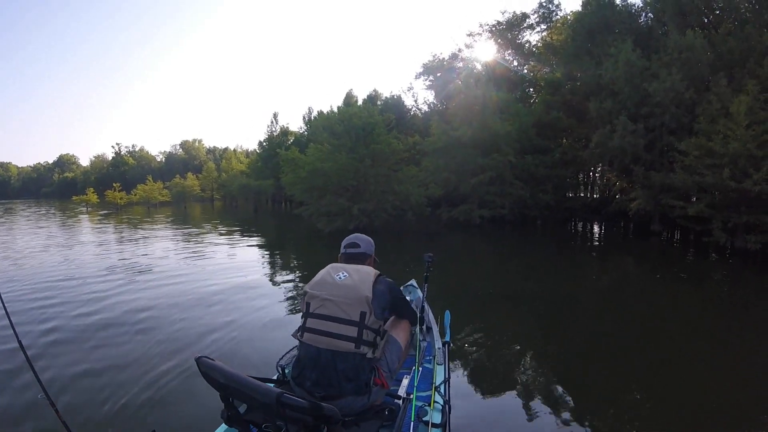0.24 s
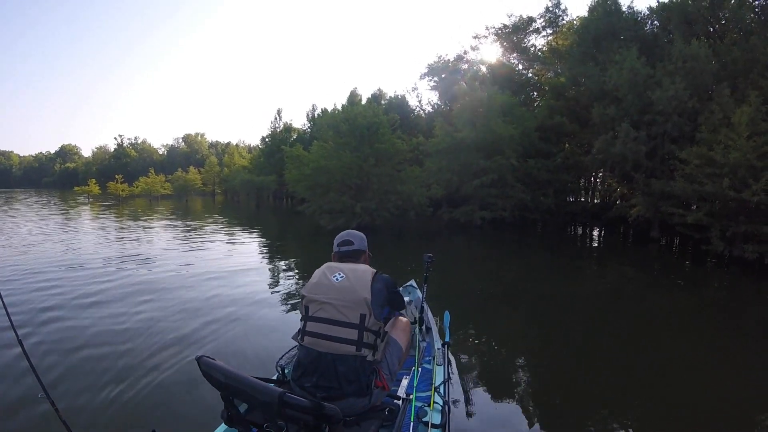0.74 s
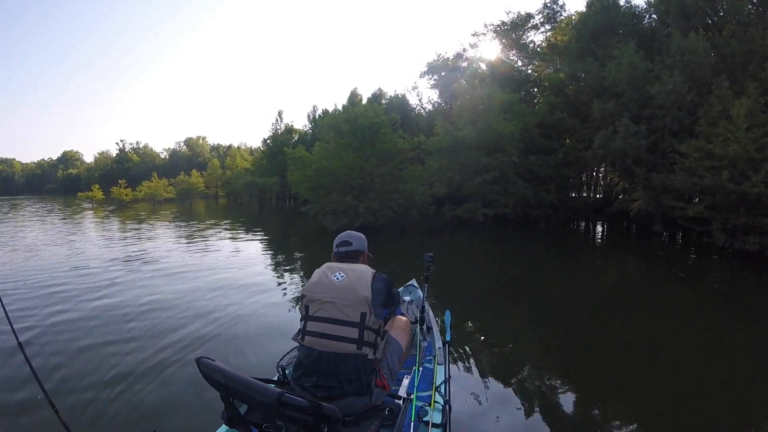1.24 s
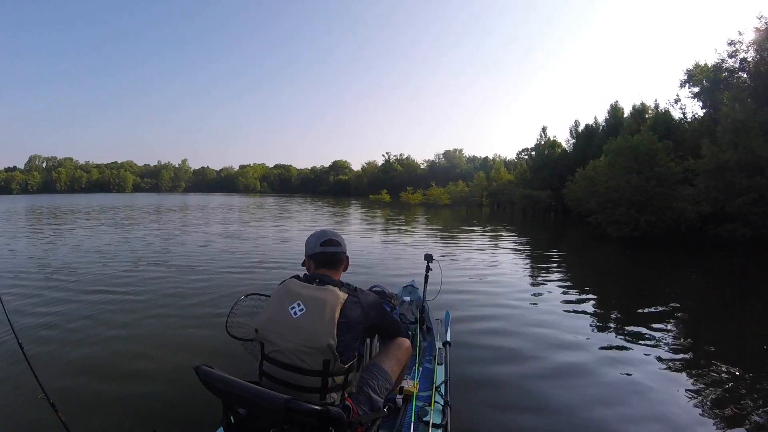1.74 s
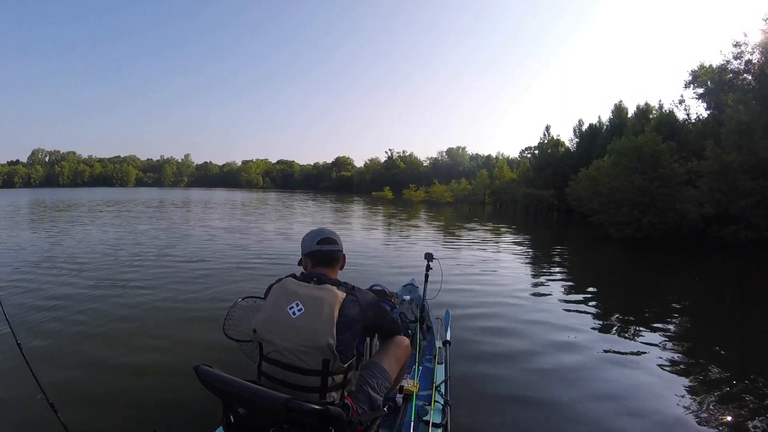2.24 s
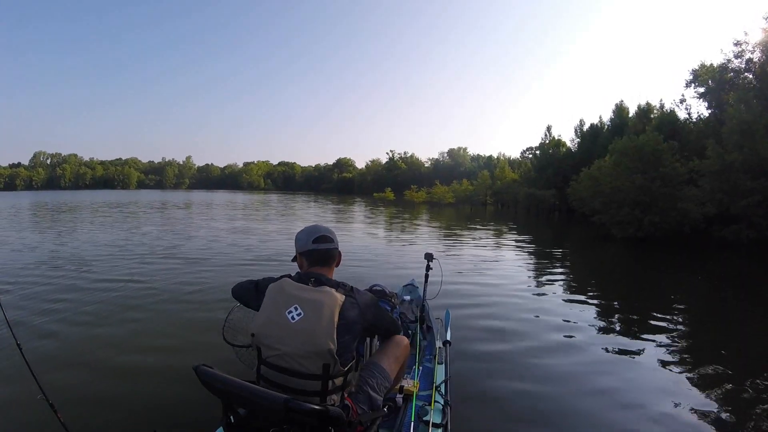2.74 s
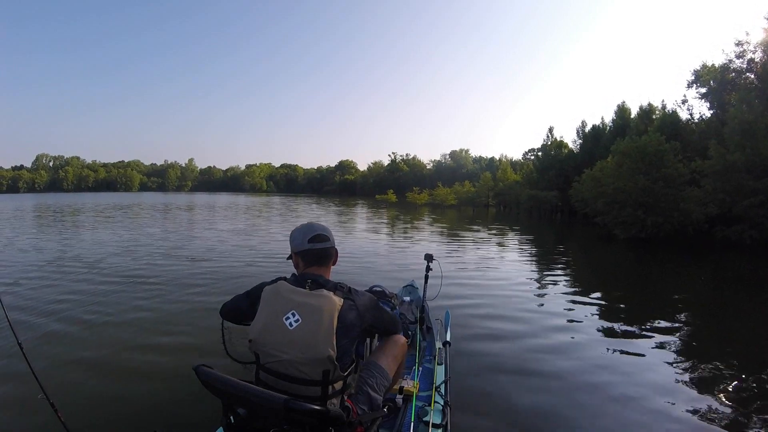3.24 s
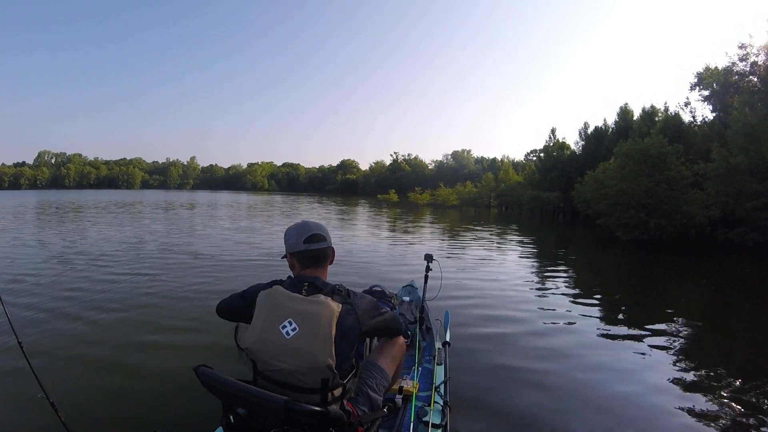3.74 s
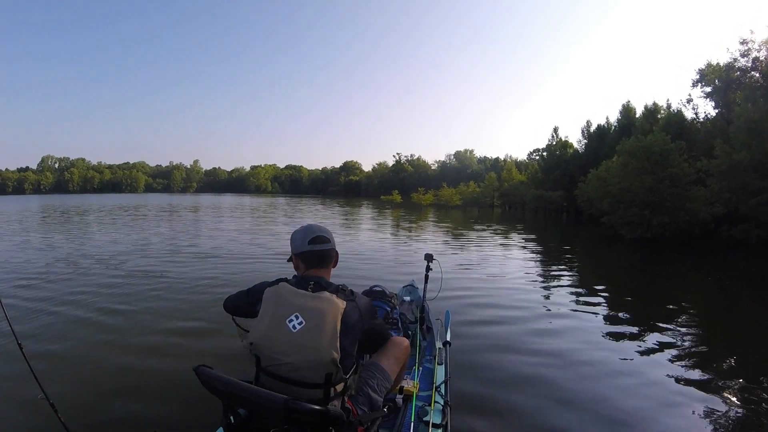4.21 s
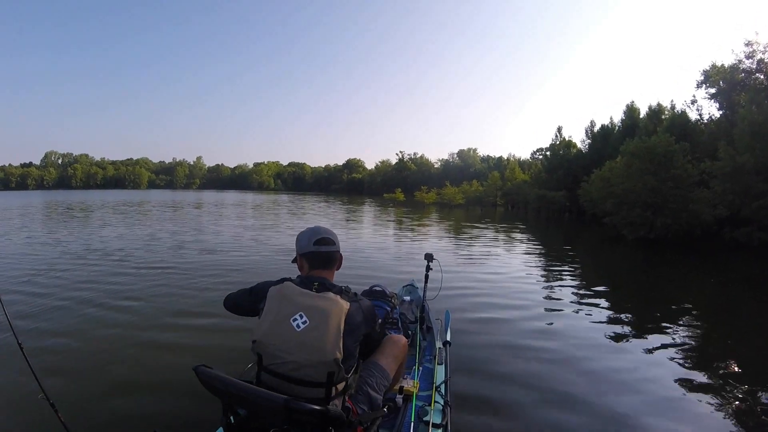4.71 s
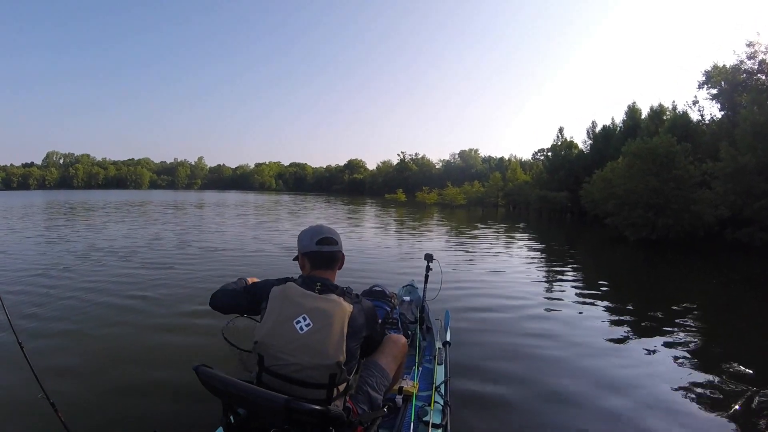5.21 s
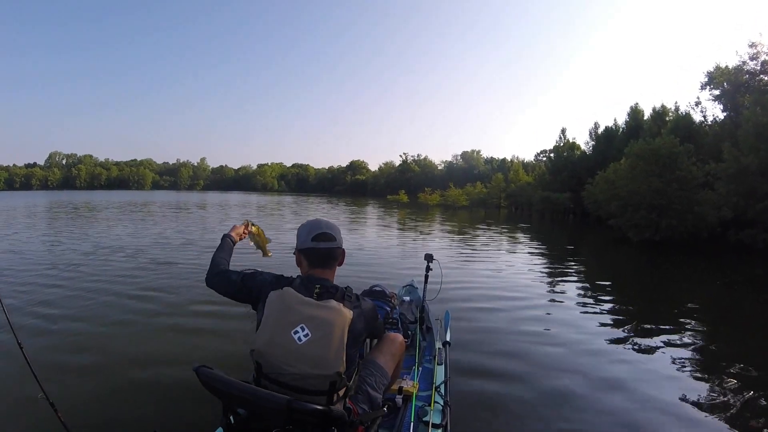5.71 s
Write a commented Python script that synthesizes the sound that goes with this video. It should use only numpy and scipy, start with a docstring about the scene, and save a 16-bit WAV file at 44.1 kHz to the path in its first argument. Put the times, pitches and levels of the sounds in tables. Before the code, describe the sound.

Hollow thumps and knocks on a plastic kayak over low rumble, then a quiet lull of faint coos and birdsong, before harder bangs near the end.

```python
"""A plastic kayak on a still lake: rumble (noise bands) and shore insects (resonant noise) lie under it all.
First a pole on the hull sways (low sines), gear knocks the deck (struck modes, noise clacks), birds chirp
(gliding sines with an echo) and shifting weight and gear shove the hull (dense slips through its modes).
From 1.5 s come a tiny click, soft coos (short sines) and a marsh bird's trill (buzzing noise bands);
from 3.5 s knocks, chirps, shoves and sway return, and the sway dies away last."""
import sys
import numpy as np
from scipy import signal
from scipy.io import wavfile

SR = 44100
rng = np.random.default_rng(int(sys.argv[2]) if len(sys.argv) > 2 else 0)


def output_pcm(signal):
    """Save a mono or channel-first signal as 16-bit PCM at the path in sys.argv[1].

    Samples are clipped to [-1, 1] before scaling.
    """
    pcm = np.clip(np.atleast_2d(signal).T, -1, 1) * 32767
    wavfile.write(sys.argv[1], SR, np.round(pcm).astype(np.int16))


N = 262659   # samples
T = np.arange(N) / SR   # s


def from_db(db):
    """Amplitude gain of a level in dB."""
    return 10 ** (np.asarray(db) / 20)


def rms_one(x):
    """Scales a signal to rms 1."""
    return x / np.sqrt(np.mean(x ** 2) + 1e-20)


def decay_per_sample(t60):
    """Factor per sample that falls 60 dB in t60 seconds."""
    return from_db(-60 / (t60 * SR))


def drift(rate):
    """Random wander of spread about 1, with a new target 2 * rate times a second."""
    count = int(N / SR * rate * 2) + 3
    targets = rng.standard_normal(count)
    return np.interp(T * rate * 2, np.arange(count), targets) * np.sqrt(3 / 2)


def ring(force, hz, t60):
    """Damped resonator: a unit click sets a sine of height 1 ringing."""
    r, w = decay_per_sample(t60), 2 * np.pi * hz / SR
    return signal.lfilter([0, np.sin(w)], [1, -2 * r * np.cos(w), r * r], force + 1e-18)


def bands(x, peaks):
    """Steep resonances in parallel, each of two resonators in a row; rms 1."""
    total = 0
    for hz, width, db in peaks:
        t60 = 2.2 / width
        total = total + from_db(db) * rms_one(ring(ring(x, hz, t60), hz, t60))
    return rms_one(total)


def dull(x, hz):
    """Low-pass that keeps a mode from spilling far above its pitch."""
    return signal.sosfilt(signal.butter(2, min(2 * hz, .45 * SR), fs=SR, output="sos"), x)


def band_pass(x, low, high):
    """Lets through what lies between two pitches."""
    return signal.sosfilt(signal.butter(2, [low, high], "band", fs=SR, output="sos"), x)


def half_octave(x, hz):
    """The half octave around a pitch; rms 1."""
    return rms_one(band_pass(x, hz / 2 ** .25, hz * 2 ** .25))


def swell(s, length, rise, fall_db_per_s, fade):
    """Gain that rises, sinks steadily and fades out at the end."""
    t = T - s
    attack = np.clip(t / rise, 0, 1)
    sinking = from_db(-fall_db_per_s * np.maximum(t - rise, 0))
    return attack * sinking * np.clip((length - t) / fade, 0, 1)


def tones(rows, rise, fall_db_per_s, fade):
    """A swelling sine for each row; a row's level is rms before the swell."""
    out = np.zeros(N)
    for s, length, hz, db in rows:
        sine = np.sqrt(2) * np.sin(2 * np.pi * hz * (T - s))
        out += from_db(db) * swell(s, length, rise, fall_db_per_s, fade) * sine
    return out


# spectrum of rumble and hiss, scaled as a whole later: f/Hz, relative level/dB per Hz
AIR_SPECTRUM = [(20, -9), (38, 2), (64, 0.5), (122, -5.5), (200, -11), (270, -20.5), (530, -29),
                (1200, -36.5), (2800, -42.5), (4600, -54), (6500, -42), (8500, -41.5), (10500, -65),
                (12000, -55), (14000, -57)]
# insect bands: f/Hz, width/Hz, relative level/dB
INSECT_BANDS = [(6500, 560, 0), (6050, 200, -10)]
# insect level before its waver: t/s, level/dB
INSECT_LEVEL = [(0.0, -67.5), (1.0, -68.5), (4.5, -66.5), (5.1, -69.5), (5.95, -68.5)]
# hull modes, also played by knocks and shoves: f/Hz, relative level/dB, t60/s
HULL_MODES = [(73, 6, 0.045), (97.3, -4, 0.33), (120.3, -3.5, 0.53), (148, -1.5, 0.11), (180.7, 1, 0.23),
              (221.6, -7.5, 0.093), (252, -9.5, 0.31), (329.8, -7.5, 0.15), (464, -14, 0.26),
              (486, -5, 0.18), (517, -1, 0.095), (543.6, -6.5, 0.1), (597, -5, .12), (719, -8, 0.043),
              (745, -3.5, 0.046), (836, -17.5, 0.099), (895.5, -10.5, 0.059), (957, -14, 0.067),
              (1085, -15.5, 0.063), (1250, -12, 0.013)]
DEEP_HZ = 340   # modes below this are the deep hull, those above the panel
RUMBLE_DB, HUM_DB = -39.5, -13.0   # rumble and hiss rms; hum against them, before its low-pass


def lake():
    """Air noise in narrow bands that each waver, hull modes humming faintly, and hissing insects."""
    white = rng.standard_normal((2, N + SR))
    hz_at, db_at = np.transpose(AIR_SPECTRUM)
    edges = 18 * 2 ** np.arange(0, 10.1, .4)   # Hz
    air = np.zeros(N)
    for k, (low, high) in enumerate(zip(edges, edges[1:])):
        band = band_pass(white[k % 2], low, high)[SR:]   # skips the filter's first second
        db = np.interp(np.log(low * high) / 2, np.log(hz_at), db_at)
        air += band * from_db(db + drift(3))
    hum = sum(from_db(db) * rms_one(ring(white[1, :N], hz, t60))
              for hz, db, t60 in HULL_MODES if hz < DEEP_HZ)
    hum = from_db(HUM_DB) * dull(rms_one(hum), DEEP_HZ)
    insect_db = np.interp(T, *np.transpose(INSECT_LEVEL)) + .8 * drift(4)
    insects = bands(white[0, :N], INSECT_BANDS) * from_db(insect_db)
    return (rms_one(air) + hum) * from_db(RUMBLE_DB) + insects


# swings of the pole: t/s, length/s, f/Hz, level/dB
SWAYS = [(0.0, 0.18, 34.3, -31.5), (.3, 0.058, 35, -14.5), (.375, .11, 35.6, -9), (.485, 0.075, 38.7, -9.5),
         (.57, 0.213, 37.8, -16), (.775, 0.076, 36.5, -26.5), (.87, 0.39, 36.1, -28.5),
         (4.33, 0.44, 37.8, -31.5), (4.91, 0.047, 36.4, -22), (4.95, .29, 53.7, -17.5),
         (5.025, 0.15, 36.4, -21), (5.24, 0.21, 53.1, -34.5), (5.83, 0.063, 52, -36)]
SWAY_RISE_S, SWAY_FALL_DB_PER_S, SWAY_STOP_S = 0.031, 48, 0.024


def pole_sway():
    """The pole, set swaying by each push, sounds as a low sine that swells, sinks and stops."""
    return tones(SWAYS, SWAY_RISE_S, SWAY_FALL_DB_PER_S, SWAY_STOP_S)


# gear on the deck, before mode levels and chance:
# t/s, panel level/dB, clack level/dB, deep hull level/dB, brightness/dB per octave
KNOCKS = [(0.04, -32.5, -59, -35, 4.5), (0.264, -37.5, -49, -29.5, 1), (0.331, -19, -41, -38, -2.5),
          (0.349, -29, -42, -27, -1), (0.383, -47, -48, -19, 6), (0.506, -28.5, -46.5, -39, 6),
          (0.537, -35, -51.5, -31.5, -4), (0.595, -49, -52, -46, -13), (0.821, -41.5, -58, -31.5, 0.1),
          (1.336, -39, -62, -35.5, -7), (3.547, -31.5, -50, -25.5, -8.5),
          (3.804, -32.5, -54.5, -26.5, -1.5), (4.225, -13.5, -30, -26.5, 3.5), (4.287, -23, -32.5, -27, -2),
          (4.315, -28.5, -41, -38, -2), (4.336, -41, -43.5, -31, -2), (4.355, -36, -48, -44, -11),
          (4.551, -22, -39, -35.5, 5), (4.59, -26.5, -45, -42, 0), (4.617, -20.5, -33, -28.5, 7),
          (4.673, -26.5, -37.5, -37, -8.5), (4.692, -29, -46.5, -38, -1.5), (4.897, -23, -26, -23, 14),
          (4.908, -5.5, -24, -15.5, 2), (4.915, -11.5, -19.5, -7, -12.5), (4.924, -15.5, -34, -9.5, 4),
          (5.005, -23.5, -53, -26, -6), (5.029, -33, -55, -33, 0.1), (5.08, -39, -50, -48, 13),
          (5.107, -38.5, -48.5, -27.5, 6)]
CONTACT_MS, DULL_LONGER = 2.33, 0.056   # base contact time; its stretch for dull knocks, per dB per octave
CHANCE_DB, STRIKE_TRIM_DB = 1.64, -5.5   # spread of each mode's luck; trim of every strike


def knocks():
    """Each knock is a short ragged contact that rings the hull modes."""
    out = np.zeros(N)
    luck = rng.normal(0, CHANCE_DB, (len(KNOCKS), len(HULL_MODES)))
    steps = np.arange(900)
    for k, (hz, mode_db, t60) in enumerate(HULL_MODES):
        force = np.zeros(N)
        cycle = np.exp(-2j * np.pi * hz * steps / SR)
        for (s, panel_db, _, deep_db, tilt), chance_db in zip(KNOCKS, luck[:, k]):
            db = deep_db if hz < DEEP_HZ else panel_db + tilt * np.log2(hz / 600)
            # low modes build up over part of a cycle
            contact_s = CONTACT_MS * np.exp(-DULL_LONGER * tilt) / 1000 + .25 / hz
            t = steps / SR / contact_s
            contact = rng.standard_normal(900) * np.sqrt(t) * np.exp(-t)
            # scaled by what the contact holds at the mode's own pitch and by its whole energy
            size = 0.52 * abs(contact @ cycle) + 0.5 * np.sqrt(np.sum(contact ** 2))
            start = int(s * SR)
            force[start:start + 900] += contact / size * from_db(db + mode_db + STRIKE_TRIM_DB + chance_db)
        out += dull(ring(force, hz, t60), hz)
    return out


# treble modes too dense to tell apart, also played by shoves:
# f/Hz, relative level/dB, t60/s before the two falls scale it
CLACK_BANDS = [(906, -9, 0.049), (1396, -1.5, 0.039), (2000, -2.5, 0.0371), (2860, -3, 0.042),
               (3660, -9, 0.021), (5340, -11.5, 0.048), (8240, -45, 0.0069), (10800, -37, .015)]
CLACK_TILT_DB = -0.45   # per octave around 2500 Hz


def clacks():
    """Each knock also sets off half-octave bands of dying noise, the dense treble of the hull."""
    out = np.zeros(N)
    s, _, clack_db, _, _ = np.transpose(KNOCKS)
    white = rng.standard_normal((2, N))
    for k, (hz, db, t60) in enumerate(CLACK_BANDS):
        blows = np.full(N, 1e-18)
        blows[(s * SR).astype(int)] = from_db(clack_db + db + CLACK_TILT_DB * np.log2(hz / 2500))
        # a fast first drop, then a fainter and longer tail
        fall = sum(share * signal.lfilter([1], [1, -decay_per_sample(times * t60)], blows)
                   for share, times in [(0.73, 0.83), (0.048, 3.0)])
        softened = signal.lfilter([.06], [1, -.94], fall)
        out += softened * half_octave(white[k % 2], hz)
    return out


# bird whistles: t/s, length/s, start f/Hz, middle f/Hz, end f/Hz, peak level/dB, roughness/0-1
CHIRPS = [(0.057, 0.035, 2262, 2430, 2370, -57.5, 0), (0.16, 0.051, 2160, 2450, 2414, -57.5, 0.03),
          (0.282, 0.03, 2140, 2350, 2410, -53, 0), (0.397, 0.039, 2310, 2330, 2290, -52.5, 0.3),
          (0.519, 0.031, 2280, 2410, 2330, -53, 0.1), (1.564, 0.055, 2570, 2490, 2460, -70, 0.16),
          (1.713, 0.016, 3380, 3300, 3300, -53, 0.7), (1.744, 0.051, 2700, 2666, 2750, -50.5, 0.53),
          (3.76, 0.28, 2310, 3150, 3520, -66, 0.63), (4.029, 0.077, 3300, 3000, 2450, -65, 0.9)]
ECHO_DB, ECHO_T60_S = -9, 0.23


def chirps():
    """Whistles on a curved glide, the rough ones wavering fast in pitch, with a short echo off the trees."""
    out, waver = np.zeros(N), drift(120)
    for s, length, start_hz, middle_hz, end_hz, db, rough in CHIRPS:
        u = np.arange(int(length * SR)) / (length * SR)
        bend_hz = middle_hz - (start_hz + end_hz) / 2
        hz = start_hz + (end_hz - start_hz) * u + bend_hz * 4 * u * (1 - u)
        span = slice(int(s * SR), int(s * SR) + len(u))
        hz = hz + 150 * rough * waver[span]
        out[span] += from_db(db) * np.sqrt(np.sin(np.pi * u)) * np.sin(2 * np.pi * np.cumsum(hz) / SR)
    tail = rng.standard_normal(6000) * from_db(-60 * np.arange(6000) / SR / ECHO_T60_S)
    echo = signal.fftconvolve(out, tail / np.sqrt(np.sum(tail ** 2)))[:N]
    return out + from_db(ECHO_DB) * echo


# shifting weight and dragging gear, levels before the trim:
# t/s, rise/s, fall/dB per s, panel level/dB, deep hull level/dB, treble level/dB
SHOVES = [(0.267, 0.07, 228, -29, -20.5, -45.5), (0.35, 0.055, 188, -41, -14.5, -57),
          (0.49, 0.021, 97, -42.5, -30.5, -53.5), (0.869, 0.0075, 260, -46.5, -33.5, -78),
          (4.23, 0.017, 330, -32, -31, -52), (4.277, 0.01, 133, -35.5, -32.5, -57),
          (4.556, 0.011, 350, -30, -38, -70), (4.607, 0.021, 150, -31.5, -31, -62),
          (4.9, 0.018, 502, -14, -8, -26.5), (4.95, 0.019, 88, -37, -15.5, -67)]
FALL_SPEEDS, SHOVE_TRIM_DB = [1, 1, 1.16], [-4.0, -3.0, -3.0]   # panel, deep hull, treble
SLIPS_PER_S = 3000


def shoves():
    """A dense, uneven run of small slips drives the hull modes and the treble bands."""
    gains, parts = np.zeros((3, N)), np.zeros((3, N))   # panel, deep hull, treble
    for s, rise, fall, *levels_db in SHOVES:
        for gain, db, speed in zip(gains, levels_db, FALL_SPEEDS):
            gain += from_db(db) * swell(s, 0.82, rise, speed * fall, 1 / 2)
    happens = rng.random(N) < SLIPS_PER_S / SR
    strength = from_db(2.63 * np.minimum(rng.exponential(1, N), 3.0))
    slips = happens * strength * rng.choice([-1, 1], N)
    for hz, db, t60 in HULL_MODES:
        # modes ring about half as long as under a knock
        parts[int(hz < DEEP_HZ)] += from_db(db) * rms_one(dull(ring(slips, hz, 0.51 * t60), hz))
    parts[2] = sum(from_db(db) * half_octave(slips, hz) for hz, db, _ in CLACK_BANDS[1:])
    return sum(gain * rms_one(part) * from_db(db) for gain, part, db in zip(gains, parts, SHOVE_TRIM_DB))


def snap():
    """A tiny broad click: one lone sample at 1.474 s, -35 dB."""
    out = np.zeros(N)
    out[int(1.474 * SR)] = from_db(-35)
    return out


# soft short coos, level before its waver: t/s, length/s, f/Hz, level/dB
COOS = [(1.475, 0.054, 486, -52), (1.535, 0.042, 500, -50), (1.612, 0.051, 497, -49),
        (1.68, 0.052, 485, -46.5), (2.065, 0.054, 487, -51), (2.105, .045, 487, -51.5),
        (2.2, 0.053, 485, -49), (2.295, 0.048, 500, -47.5), (2.33, 0.057, 488, -46),
        (2.395, 0.062, 502, -49)]
COO_RISE_S, COO_FADE_S, COO_WAVER_DB = .03, .035, 2.5


def coos():
    """Far coos: short swelling sines whose level wavers."""
    return tones(COOS, COO_RISE_S, 0, COO_FADE_S) * from_db(COO_WAVER_DB * drift(40))


# bands of a marsh bird's buzzy trill: f/Hz, width/Hz, relative level/dB
TRILL_BANDS = [(2820, 150, -3), (2960, 130, -3), (3310, 160, -1.5), (3680, 380, -7.5)]
TRILL_S, TRILL_LENGTH_S, TRILL_RISE_S, TRILL_FADE_S = 1.77, .58, 0.02, 0.031
TRILL_DB, TRILL_FALL_DB_PER_S = -65, 3.0


def trill():
    """Noise pulsing slightly at 60 Hz buzzes through a few narrow resonances."""
    buzz = rng.standard_normal(N) * (1 + 0.12 * np.sin(2 * np.pi * 60 * T))
    gain = swell(TRILL_S, TRILL_LENGTH_S, TRILL_RISE_S, TRILL_FALL_DB_PER_S, TRILL_FADE_S)
    return bands(buzz, TRILL_BANDS) * from_db(TRILL_DB) * gain


def scene():
    """Lake, pole, hull and birds together, as one channel."""
    out = lake() + pole_sway() + knocks() + clacks() + chirps() + shoves() + snap() + coos() + trill()
    return out[None]


def record(dry):
    """Peaks are rounded towards 0.85, then the top is cut steeply from 15780 Hz."""
    rounded = .85 * np.tanh(dry / .85)
    return signal.sosfilt(signal.cheby2(12, 70, 15780, fs=SR, output="sos"), rounded)


dry = scene()
out = record(dry)
output_pcm(out)
```